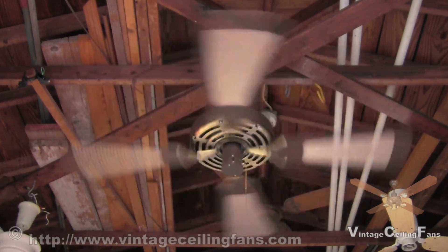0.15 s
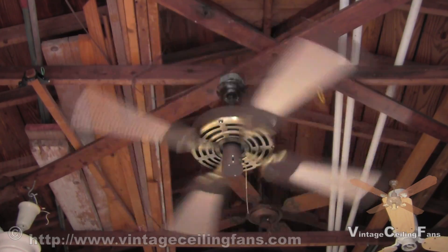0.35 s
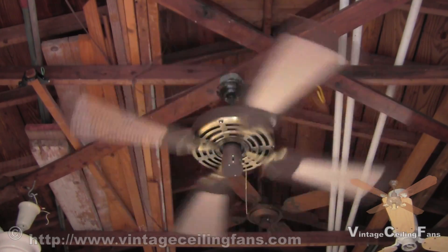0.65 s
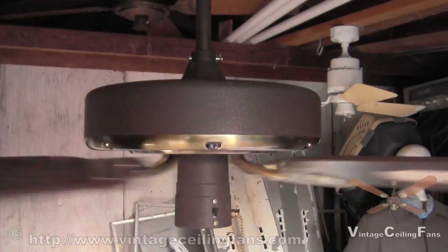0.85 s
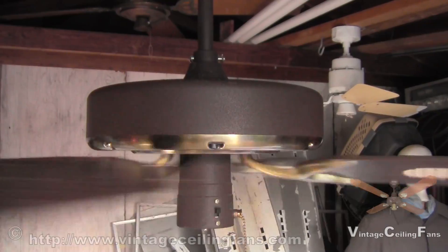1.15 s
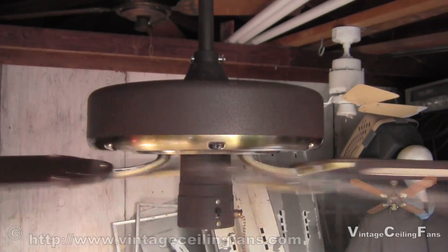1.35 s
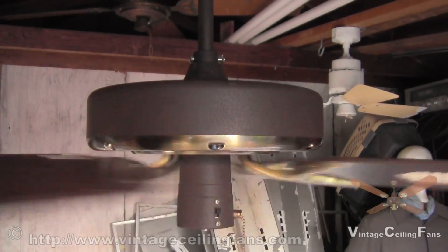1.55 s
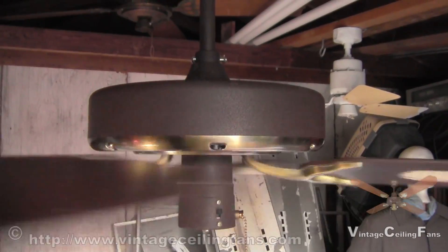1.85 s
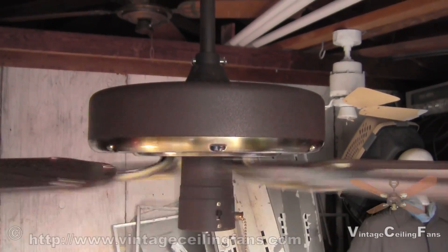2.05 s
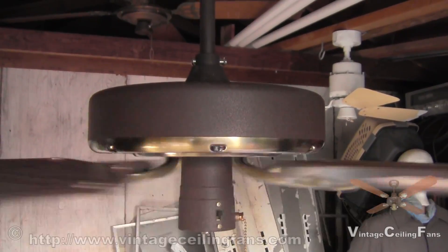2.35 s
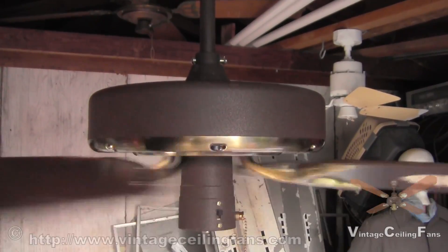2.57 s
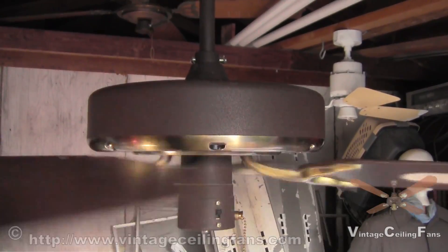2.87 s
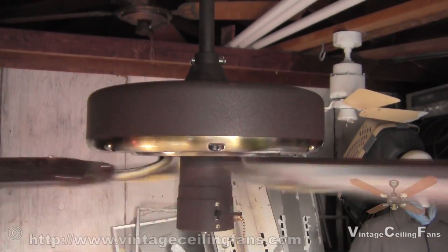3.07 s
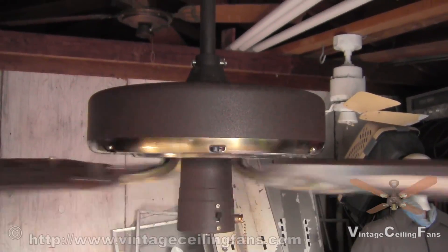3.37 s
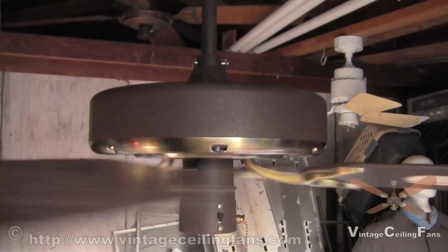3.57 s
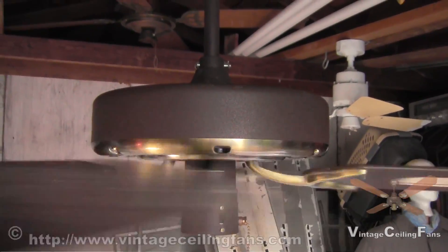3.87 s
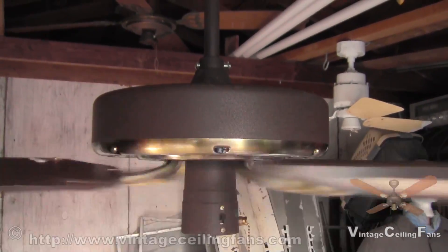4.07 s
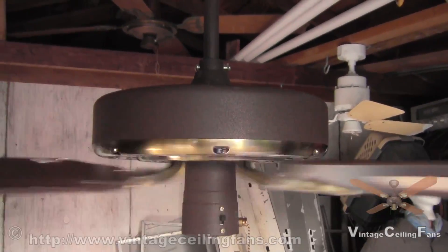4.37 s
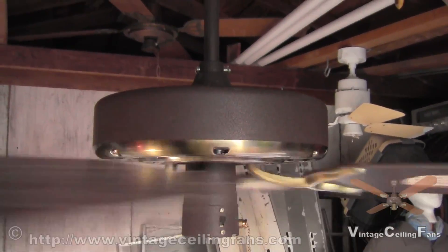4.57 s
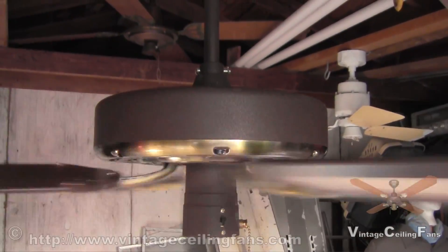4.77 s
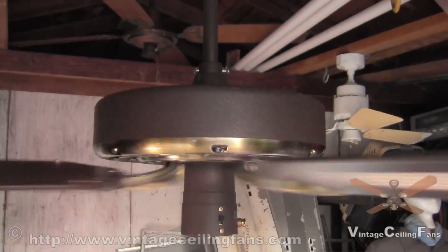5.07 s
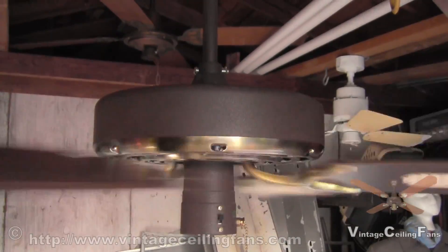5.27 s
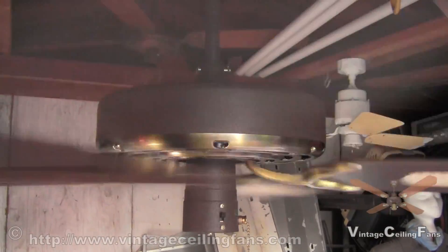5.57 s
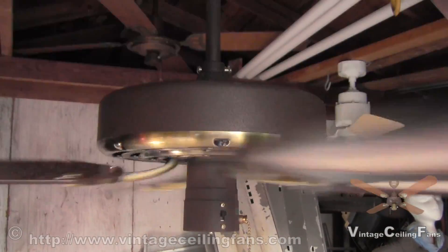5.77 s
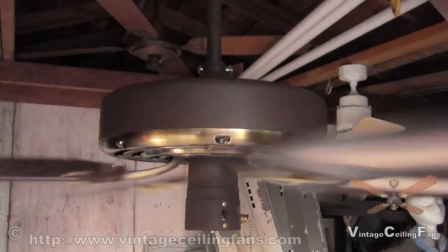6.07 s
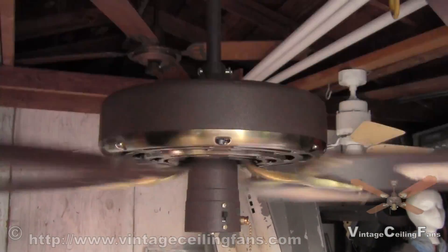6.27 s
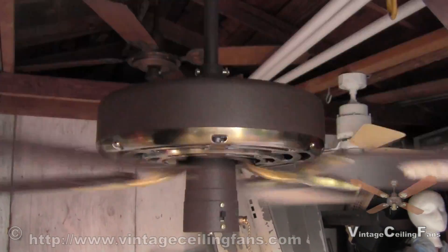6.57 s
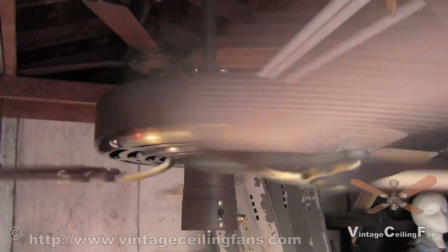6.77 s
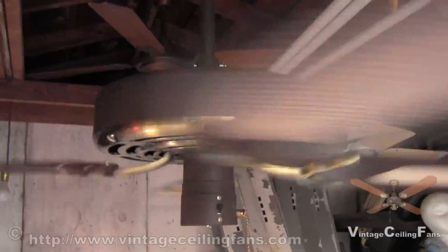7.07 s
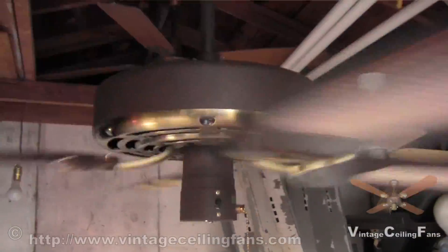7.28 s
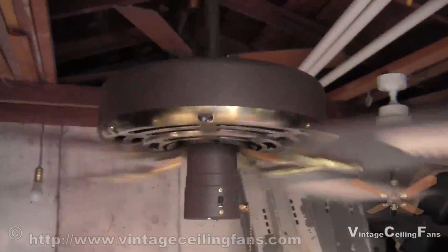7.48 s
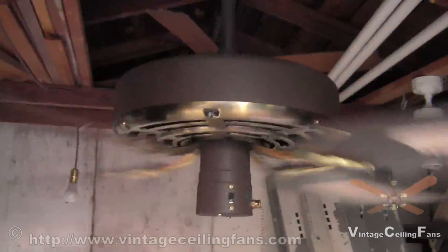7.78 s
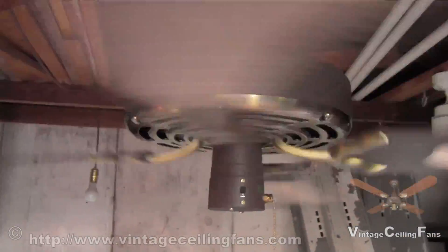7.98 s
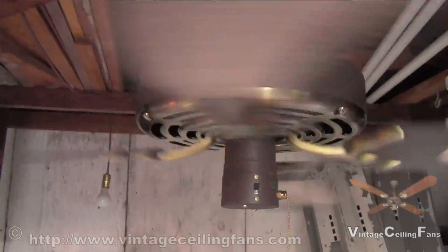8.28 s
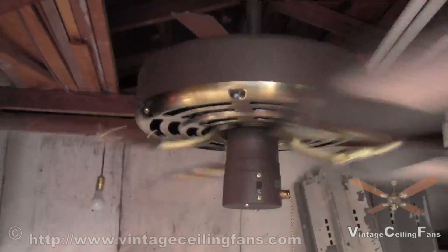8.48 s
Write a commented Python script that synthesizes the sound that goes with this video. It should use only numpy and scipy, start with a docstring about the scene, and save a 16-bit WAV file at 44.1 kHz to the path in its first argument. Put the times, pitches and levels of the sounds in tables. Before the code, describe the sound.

Spinning fan blades pound the air right beside the microphone in fast, even, distorted thumps, then soften into rhythmic swishes over a low room drone.

```python
"""A four-blade ceiling fan slowly gains speed in a wooden attic; from 0.7 s its blade tips pass right beside the microphone.
Each blade pushes and sucks the air as it goes by: a pressure pulse, heard as a thump about 13 times a second.
Its wake is a burst of coloured noise that buffets the microphone, one blade hardest, with crackles and snaps.
From 5 s the microphone sinks below the blades: the thumps fade, leaving noise that swells with each blade.
A drone of the room, turned down as by a recorder's gain control while the thumps are loud, and a faint motor ring."""
import sys
import numpy as np
from scipy import signal
from scipy.fft import rfft, irfft
from scipy.io import wavfile
from scipy.ndimage import uniform_filter1d, minimum_filter1d

SR = 44100
rng = np.random.default_rng(int(sys.argv[2]) if len(sys.argv) > 2 else 0)


def transcribe(signal):
    """Save signal, clipped to [-1, 1], as a 16-bit WAV file at the path in sys.argv[1]."""
    frames = np.atleast_2d(signal).T
    limited = np.clip(frames, -1, 1)
    pcm = np.round(limited * 32767).astype(np.int16)
    wavfile.write(sys.argv[1], SR, pcm)


N = 380583
TIME = np.arange(N) / SR
NEAR = np.arange(-1800, 2400) / SR  # seconds before and after one event, such as a blade going by

# Colour of the tiny, hard eddies that snap and crackle: f/Hz, relative level per Hz/dB
SNAP_COLOUR = [(100, -18.5), (500, 11), (1500, 3.5), (3000, -8.5), (4500, -23.5), (9000, -62.5),
               (16000, -62.5)]
# How far the near sounds lean to one side: t/s, left minus right/dB
PAN = [(.7, 2.0), (2.5, 2.1), (4.5, 2.1), (5.3, 1.8), (6.0, .3), (7.0, -.5), (8.6, -1.4)]
# Share of a left-minus-right difference that goes to each port (microphone opening): left, right [no unit]
SIDES = np.array([[.5], [-.5]])


def amp(db):
    """Turns decibels into a gain."""
    return 10 ** (np.asarray(db) / 20)


def evened(x):
    """Scales a sound to an average (rms) strength of 1."""
    return x / np.sqrt(np.mean(x ** 2) + 1e-20)


def read(points, hz):
    """Reads a spectrum table at the frequencies hz, in straight lines over log frequency."""
    f, value = np.transpose(points)
    return np.interp(np.log(hz + 1), np.log(f + 1), value)


def follow(rows, s):
    """Reads every column of a time table at the times s."""
    times, *columns = np.transpose(rows)
    return [np.interp(s, times, column) for column in columns]


def add(mix, s, sound):
    """Mixes in, around time s, a sound laid out along NEAR, with soft ends."""
    start = round((s + NEAR[0]) * SR)
    part = mix[:, start:][:, :len(NEAR)]
    softened = sound * signal.windows.tukey(len(NEAR), .25)
    part += softened[..., :part.shape[1]]


def noise(colour, size, same=None, tilt=0):
    """Makes two channels of coloured noise, alike by `same`, with `tilt` dB an octave from 200 to 2400 Hz."""
    # Left-right likeness of sound that arrives through the air: f/Hz, likeness [1 = identical]
    airborne_likeness = [(60, 0.8), (130, 1), (300, 0.89), (1400, 0.94), (3100, 0.87), (6800, 0.55),
                         (11000, 0.18), (15000, .05)]
    hz = np.fft.rfftfreq(size, 1 / SR)
    a, b = rfft(rng.standard_normal((2, size)))
    likeness = np.clip(read(airborne_likeness, hz) if same is None else same, -1, 1)
    mid = a * np.sqrt(1 + likeness)
    side = b * np.sqrt(1 - likeness)
    octaves = np.log2(np.clip(hz, 200, 2400) / 200)
    shape = amp(read(colour, hz) + tilt * octaves)
    return evened(irfft(np.array([mid + side, mid - side]) * shape, size))


def room():
    """The attic returns the fan as a diffuse drone; a narrow resonance turns noise into the motor's ring."""
    # Colour of the drone: f/Hz, relative level per Hz/dB
    drone_colour = [(15, -55), (25, -18), (145, 8), (212, 0.5), (309, 5.5), (405, -3.5), (489, 0.5),
                    (796, -6), (1230, -8.5), (1700, -16), (2350, -17.5), (3340, -24), (4140, -24.5),
                    (14800, -48), (16000, -54)]
    # The drone as heard, turned down as by a recorder's gain control while the thumps are loud: t/s, level/dB
    drone_level = [(0, -45.5), (.7, -45), (1.0, -61.5), (2.5, -62.5), (3.3, -70), (4.5, -44), (8.6, -42.5)]
    # The motor's ring as heard: t/s, level/dB
    whine_level = [(0, -66), (.7, -73), (1.2, -71), (3.5, -75), (5.0, -62.5), (8.6, -64)]
    whine_hz, whine_width_hz = 2332, 42
    pole = np.exp((2j * np.pi * whine_hz - np.pi * whine_width_hz) / SR)
    ring = signal.lfilter([1], [1, -pole], noise([(20, 0), (16000, 0)], N)).real  # fed with flat noise
    drone = noise(drone_colour, N) * amp(follow(drone_level, TIME)[0])
    return drone + evened(ring) * amp(follow(whine_level, TIME)[0])


def blade_passes():
    """Four blades on a turning hub pass every quarter turn; rows: t/s, suction/dB, wake/dB, wake tilt/dB per octave."""
    # The fan gathers speed: t/s, speed/turns per second
    speed = [(0, 3.1456), (2.3, 3.1868), (3.6, 3.2264), (5.5, 3.2652), (8.6, 3.3477)]
    # The unevenly hung blades, the last nearest to the microphone: lateness/s, extra wake at full effect/dB
    blade_offsets = [(0, 1.5), (-.0016, -2.5), (-.0008, -2.5), (.0003, 5.5)]
    # The microphone comes up to the tips, then sinks: t/s, relative suction/dB, share of unevenness felt [factor]
    nearness = [(.71, -14, 0), (.95, 0, 0.65), (1.5, -2, 0.63), (2.6, -1.4, 1.07), (3.5, -1.4, 0.9),
                (4.1, -2.5, 0.44), (4.45, -3.5, 0.77), (5.0, -9, 0.056), (5.5, -19.5, 0.26), (6.2, -27, 0),
                (7.5, -32.5, 0), (8.6, -48, 0)]
    # How deep it sits in the stirred air: t/s, relative wake level/dB, relative wake brightness/dB per octave
    stir = [(.71, -32.5, -8), (.93, -20, -6.5), (1.15, -14.5, -4.5), (1.45, -20, -5.5), (1.85, -22.5, -4.5),
            (2.35, -21, -5), (3.2, -20.5, -4), (3.7, -17, -2.5), (4.25, -14.5, -3), (4.75, -20.5, -6),
            (5.3, -26.5, -4.5), (5.9, -35.5, -6), (6.25, -26, -3.5), (6.5, -33.5, -2.5), (6.9, -27.5, -3),
            (7.15, -40, 2), (8.6, -39.5, 0.5)]
    # Wakes that hit it squarely: t/s (picks the nearest pass), relative level/dB, relative brightness/dB per octave
    buffets = [(1.27, -12, -3.5), (1.58, -4.5, -4), (2.53, -9.5, -2.5), (2.84, -11.5, -1),
               (3.15, -10.5, -1), (3.46, -12.5, 0.5), (3.54, -16, 1.5), (3.77, -13.5, -1.5),
               (3.85, -15, 0.5), (4.0, -13, -1), (4.08, -5.5, -1), (4.39, -8, -1.5), (4.47, -13.5, 0),
               (4.62, -14.5, -2.5), (5.0, -15.5, -6.5)]
    first_pass_s = .7139
    # for each dB of extra wake: dB of suction, and dB per octave of brightness
    suction_per_db, brightness_per_db = 0.24, 0.59
    scatter_db = 0.8  # chance difference from one wake to the next

    turns = np.cumsum(follow(speed, TIME)[0]) / SR
    gone_by = len(blade_offsets) * (turns - np.interp(first_pass_s, TIME, turns))
    number = np.arange(int(gone_by[-1]) + 1)
    late, nearer_db = np.array(blade_offsets)[number % len(blade_offsets)].T
    s = np.interp(number, gone_by, TIME) + late
    suction_db, felt = follow(nearness, s)
    wake_db, brightness = follow(stir, s)
    extra_db = felt * nearer_db + scatter_db * rng.standard_normal(len(s))
    suction_db = suction_db + suction_per_db * extra_db
    brightness = brightness + brightness_per_db * extra_db
    passes = np.transpose([s, suction_db, wake_db + extra_db, brightness])
    for when, *wake in buffets:
        passes[np.argmin(abs(s - when)), 2:] = wake
    return passes


def rush(passes, rise_s=0.013, fall_s=0.011, peak_s=0.0037, hiss_db=-33):
    """Air noise swells with each blade; a short hiss before each strong thump is cut off as by a limiter."""
    # Air streaming off the blades: t/s, steady rush/dB, typical peak swish of a blade/dB
    air_level = [(0, -73, -80), (.65, -59, -57), (.95, -47, -45), (2.5, -47, -47), (3.1, -52.5, -50),
                 (3.6, -52.5, -46), (4.0, -58.5, -37), (4.5, -49, -36), (5.0, -48, -33), (5.5, -46, -34),
                 (6.5, -55, -31.5), (7.3, -45.5, -33.5), (8.6, -46, -36.5)]
    # Colour of the streaming air: f/Hz, relative level per Hz/dB
    air_colour = [(25, -25.5), (70, -8), (130, 8.5), (330, 2.5), (520, 1), (750, -7), (1150, -11),
                  (1900, -19), (2400, -20.5), (3000, -26), (4300, -30), (7000, -37.5), (10500, -44.5),
                  (16000, -54.5)]
    swish_uneven_db = .7  # chance difference from one swish to the next
    swell, hiss = np.zeros((2, 2, N))
    late = NEAR - peak_s
    swish = np.exp(np.minimum(late / rise_s, -late / fall_s))
    since_peak = NEAR + .003
    hiss_shape = np.exp(np.minimum(since_peak / .0095, -since_peak / .003))  # slow rise, quick fall
    for (s, suction_db, _, _), chance in zip(passes, rng.standard_normal(len(passes))):
        add(swell, s, amp(swish_uneven_db * chance) * swish)
        add(hiss, s, amp(suction_db + hiss_db) * hiss_shape)
    steady_db, swish_db = follow(air_level, TIME)
    steady = noise(air_colour, N) * amp(steady_db)
    return steady + noise(air_colour, N) * (amp(swish_db) * swell + hiss)


def thumps(passes, level_db=1.0, wobble=.17):
    """Pressure rises ahead of the leading edge, drops under the blade and springs back at the trailing edge."""
    # The typical blade: t/s, edge softness/s, time to cross/s, push ahead of it [factor on suction],
    # growth of suction along the blade [nepers, natural-log units]
    blade_shape = [(.8, .0039, .0075, 1.05, -1.3), (1.2, .0038, .0041, 1.05, -.5),
                   (3.2, .0038, .0041, 1.05, -.5), (4.0, .0036, .008, 1.35, -1.8),
                   (4.9, .004, .0101, 1.35, 0), (6.2, .0051, .01, 2.2, 1.5), (7.8, .006, .0106, 1.5, 1.1)]
    sharper_per_db = 0.1318  # the port nearer to the blade meets a sharper edge: nepers per dB of pan
    bass_cut_hz, bass_cut_q = 65.7, 1.16
    out = np.zeros((2, N))
    for (s, suction_db, _, _), chance in zip(passes, rng.standard_normal(len(passes))):
        edge, cross, push, growth = follow(blade_shape, s)
        cross = cross * np.exp(wobble * chance)  # the stirred air never meets two blades alike
        edge = edge * np.exp(-sharper_per_db * SIDES * follow(PAN, s)[0])
        ahead = push * np.exp(-(2 * NEAR / edge + 1) ** 2)
        entered = (1 + np.tanh(NEAR / edge)) / 2
        not_left = (1 - np.tanh((NEAR - cross) / .0014)) / 2
        suction = entered * not_left * np.exp(growth * np.clip(NEAR / cross, 0, 1))
        add(out, s, amp(suction_db + level_db) * (ahead - suction))
    # the microphone's bass cut turns each dip into a short swing
    w = 2 * np.pi * bass_cut_hz
    b, a = signal.bilinear([1, 0, 0], [1, w / bass_cut_q, w * w], SR)
    return signal.lfilter(b, a, out)


def wakes(passes, tilt_db=-0.58, trail=.07, trail_s=0.024, lumpy=0.41, shared_hz=135,
          gentle_db=-21, stretch=0.064):
    """Each leading edge sheds a lumpy burst of eddies that trails away; a few stray gusts are added."""
    # The wake's shape: t/s, left-right likeness of small eddies [1 = identical, -1 = opposite],
    # lag behind the leading edge/s, half length/s (both for a gentle wake)
    wake_shape = [(1.0, -.5, 0.0062, 0.005), (3.2, -0.17, 0.0041, 0.0067), (4.3, -0.21, 0.0054, 0.0044),
                  (5.0, -0.25, 0.007, 0.012), (5.6, 0.83, 0.0037, 0.0045), (6.5, 0.96, 0.0028, 0.0058),
                  (8.5, 1, 0.0013, 0.008)]
    # Colour of the eddies before brightening: f/Hz, relative level per Hz/dB
    eddy_colour = [(30, -21.5), (90, -1.5), (200, 0.5), (300, -6), (500, -11), (1000, -26.5), (2000, -41),
                   (4000, -65.5), (8000, -76.5), (16000, -79)]
    # Stray gusts that trail a blade: t/s, peak level before panning/dB, half length/s
    stray_gusts = [(1.592, -7, 0.0022), (3.816, -26.5, 0.0083), (4.414, -20, 0.0054), (5.02, -19, 0.0062),
                   (5.348, -24, 0.02)]
    out = np.zeros((2, N))
    # large, deep eddies cover both ports; small ones differ between them
    hz = np.fft.rfftfreq(len(NEAR), 1 / SR)
    small = 1 - 1 / (1 + (hz / shared_hz) ** 6)
    for s, _, wake_db, tilt in passes:
        same, lag, half = follow(wake_shape, s)
        length = 1 + stretch * max(wake_db - gentle_db, 0)  # a strong wake also lasts longer
        late = NEAR - lag * length
        half = half * length
        tail = trail * (1 + np.tanh(late / half)) * np.exp(-abs(late) / trail_s)
        shape = np.exp(-(late / half) ** 2) + tail
        ripple = evened(uniform_filter1d(rng.standard_normal(len(NEAR)), size=120))
        lumps = np.exp(lumpy * ripple)
        eddies = noise(eddy_colour, len(NEAR), 1 - (1 - same) * small, tilt + tilt_db)
        burst = evened(eddies * shape * uniform_filter1d(lumps, size=60))
        add(out, s, amp(wake_db) * burst / np.sqrt(3))
    for s, gust_db, half in stray_gusts:
        gust = noise(eddy_colour, len(NEAR), 1 - small) * np.exp(-(NEAR / half) ** 2)
        add(out, s, amp(gust_db) * gust)
    return out


def crackle(passes, level_db=-28, per_s=400, spread_db=4, lag_s=0.01, half_s=0.011, grain_s=0.00068, bright=2.9):
    """Tiny eddies tear at the ports behind each blade, more fiercely in a strong, bright wake."""
    size = np.zeros((2, N))
    for s, _, wake_db, tilt in passes:
        chance = per_s / SR * np.exp(-((NEAR - lag_s) / half_s) ** 2)
        struck = rng.random(len(NEAR)) < chance
        heights = amp(spread_db * np.minimum(rng.exponential(1, len(NEAR)), 2))
        add(size, s, amp(wake_db + level_db + bright * tilt) * struck * heights)
    grain = np.exp(-(NEAR[abs(NEAR) < .004] / grain_s) ** 2)
    return noise(SNAP_COLOUR, N, same=0) * signal.oaconvolve(size, grain[None], "same")


def snaps(snap_s=0.0023, tick_s=0.011):
    """Hard eddies snap on the ports as very short noise bursts; one faint, thin tick is added."""
    # The snaps: t/s, peak level before panning/dB
    snap_times = [(1.279, -33), (1.588, -34), (2.531, -33), (2.838, -35), (2.855, -33), (3.459, -28),
                  (3.538, -31), (3.771, -29), (3.856, -25), (4.013, -32), (4.097, -35), (4.401, -15),
                  (5.355, -34)]
    # Colour of the tick: f/Hz, relative level per Hz/dB
    tick_colour = [(500, -29), (3000, -5), (6000, 3), (9500, -5), (11500, -18), (16000, -28)]
    tick_at_s, tick_db = 6.297, -53  # level before panning
    out = np.zeros((2, N))
    for s, snap_db in snap_times:
        snap = noise(SNAP_COLOUR, len(NEAR), same=0) * np.exp(-(NEAR / snap_s) ** 2)
        add(out, s, amp(snap_db) * snap)
    tick = noise(tick_colour, len(NEAR)) * np.exp(-abs(NEAR) / tick_s)
    add(out, tick_at_s, amp(tick_db) * tick)
    return out


def scene(air_pan_db=-0.7, thump_pan_share=0.96):
    """The near sounds follow PAN, from left to right; the airborne sound leans slightly right."""
    passes = blade_passes()
    pan_db = SIDES * follow(PAN, TIME)[0]
    pressure = thumps(passes) * amp(thump_pan_share * pan_db)
    buffeting = (wakes(passes) + crackle(passes) + snaps()) * amp(pan_db)
    airborne = (rush(passes) + room()) * amp(SIDES * air_pan_db)
    return pressure + buffeting + airborne


def record(dry):
    """A limiter turns loud peaks down and hushes the air briefly after them; a low-pass then cuts the top."""
    ceiling, hold_s, recovery_db_per_s = .88, .002, 90  # ceiling: sample value where limiting begins
    edge_hz = 15800
    size = 2 * round(hold_s * SR / 2) + 1
    headroom_db = np.minimum(20 * np.log10(ceiling / (abs(dry).max(0) + 1e-9)), 0)
    # the gain drops quickly and climbs back at a steady rate
    recovered = recovery_db_per_s * TIME
    gain_db = np.minimum.accumulate(minimum_filter1d(headroom_db, size) - recovered) + recovered
    limited = dry * amp(uniform_filter1d(gain_db, size))
    low_pass = signal.firwin(511, edge_hz, window=("kaiser", 9), fs=SR)
    return signal.oaconvolve(limited, low_pass[None], "same")


dry = scene()
out = record(dry)
transcribe(out)
```